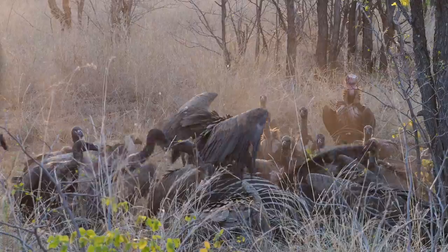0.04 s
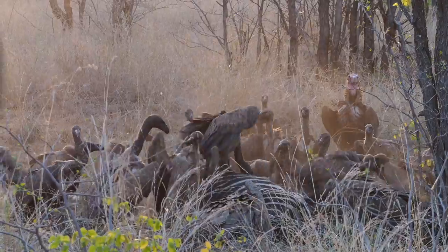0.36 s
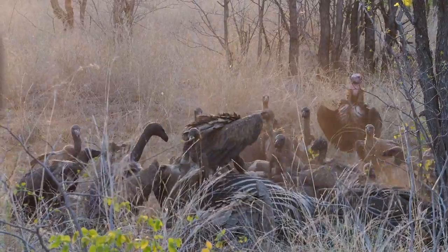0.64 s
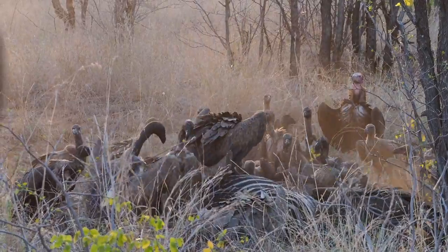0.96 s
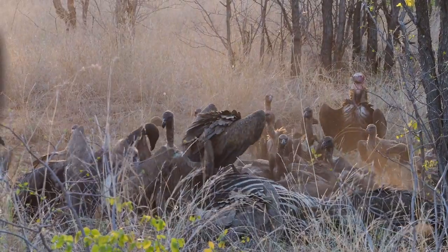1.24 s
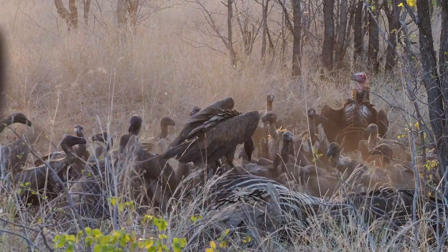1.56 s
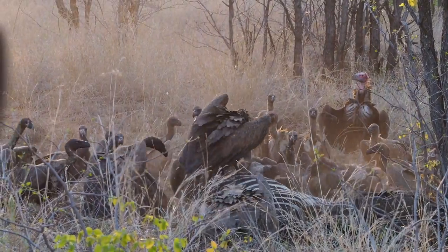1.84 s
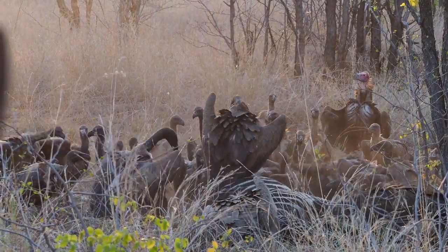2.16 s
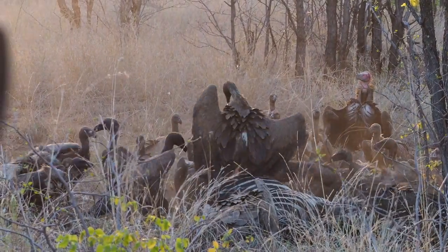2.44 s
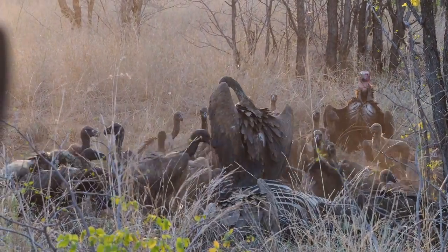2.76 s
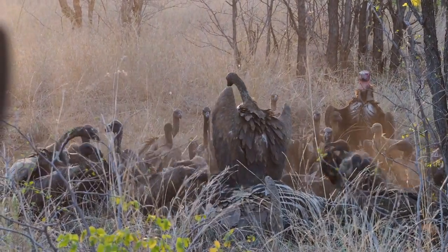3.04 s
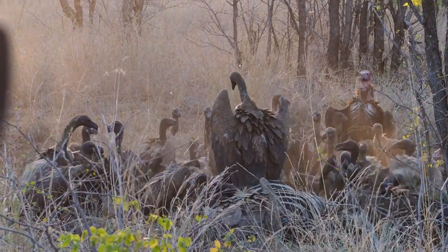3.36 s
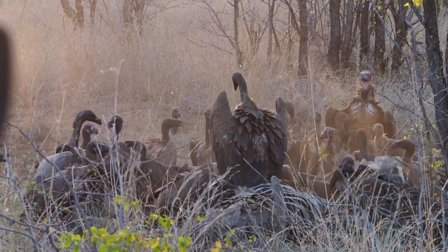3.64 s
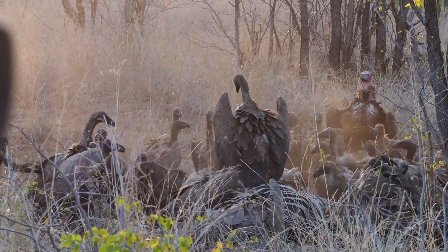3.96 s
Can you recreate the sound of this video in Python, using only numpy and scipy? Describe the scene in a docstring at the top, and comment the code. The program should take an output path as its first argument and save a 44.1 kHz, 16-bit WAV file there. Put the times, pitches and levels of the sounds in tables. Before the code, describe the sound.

Vultures squawk and hiss over the low throb of an idling engine.

```python
"""Vultures squabbling over a carcass in dry grass, in stereo from a vehicle with its engine idling.
Air forced through throat and open bill makes short rasping squawks and longer hisses; there is
one dry cackle, and feathers brush the grass. The rest of the flock hisses farther off.
Close to the microphone the engine throbs with its firing pulses and the fan hums and rushes."""
import sys
import numpy as np
from scipy import signal
from scipy.fft import rfft, irfft
from scipy.io import wavfile

SR = 44100
rng = np.random.default_rng(int(sys.argv[2]) if len(sys.argv) > 2 else 0)


def pcm_store(signal):
    """Save signal as 16-bit PCM."""
    levels = np.round(np.clip(np.atleast_2d(signal), -1, 1) * 32767)
    wavfile.write(sys.argv[1], SR, levels.astype(np.int16).T)


N = 176400
TIME = np.arange(N) / SR

# Squawks at the carcass: (start [s], length [s], level [dB], pitch [Hz], rasp [0-1], sag [octaves],
# breath level [dB], left over right [dB])
SQUAWK_CALLS = [(0.0, 0.022, -24.5, 2550, 0.34, 0.13, -30, -2.5),
                (0.021, 0.03, -22.5, 2520, 0.56, 0.16, -39, -3),
                (.044, 0.021, -36.5, 2450, 1, .02, -36, -3), (.062, 0.028, -34, 2650, .8, .1, -39, -1),
                (0.107, 0.012, -33, 2500, 1, .05, -42, -3), (.122, 0.02, -21, 2627, 0.06, 0.024, -34.5, -4),
                (.136, 0.022, -26, 2200, 0.98, 0.059, -39.5, -3),
                (.224, .022, -56, 2700, 0.7, .05, -49, -1), (.322, 0.045, -33.5, 2950, 0.8, 0.018, -51, 1),
                (.379, 0.04, -31, 2940, 1, 0.022, -47, 1), (0.435, 0.036, -31.5, 2430, 0, 0.052, -53, -2),
                (.509, 0.044, -23, 2766, 0.42, 0.05, -42.5, -2),
                (.564, 0.05, -20, 2945, 0.43, 0.1, -43, -2),
                (0.616, 0.045, -26.5, 2620, 0.4, 0.095, -39, -1.5),
                (.688, .038, -38, 2850, 0.8, .05, -45, -3), (1.813, 0.011, -28, 2660, 0.1, .04, -33, -1.5),
                (1.825, 0.023, -31, 2560, 0.9, 0.053, -37.5, -1.5),
                (1.848, 0.024, -37, 2400, 0.6, .08, -45, -4), (2.255, 0.041, -39, 2700, 1, .03, -46, -1),
                (2.341, 0.032, -33, 2520, 0.36, 0.033, -44, -3),
                (2.869, .025, -31, 2400, 0.2, 0.036, -41.5, -1),
                (2.917, 0.06, -37, 2550, 0.87, 0.034, -37, 3),
                (2.935, 0.017, -21.5, 2600, 0.18, 0.021, -47, -2),
                (2.951, 0.017, -55, 2400, 0.92, .1, -36, -2),
                (2.994, 0.02, -31.5, 2480, 0.45, .02, -40, -2),
                (3.014, 0.025, -30, 2380, 0.75, 0.11, -44, -4),
                (3.732, .036, -36, 2550, 0.9, 0.027, -43.5, -2)]
# Throaty hisses: (start [s], length [s], level [dB], throat resonance [Hz], sag [octaves],
# breath level [dB])
HISS_CALLS = [(2.802, 0.056, -46, 2620, .05, -42), (3.121, 0.11, -25.5, 2762, 0.061, -33.5),
              (3.17, 0.15, -28, 2580, .14, -42.5), (3.471, .06, -36.5, 2650, 0.018, -41.5),
              (3.522, .09, -34.5, 2615, 0.105, -38.5), (3.576, 0.14, -32.5, 2664, 0.012, -47),
              (3.817, .06, -49, 2670, .03, -51)]
# Mouth and bill resonances: (multiple of the throat pitch [ratio], level against the breath [dB])
BILL_MODES = [(1.6, -3), (1.999, -7.5)]
# Creaks of the cackle, and feathers on grass: (start [s], length [s], level [dB])
CACKLE_CREAKS = [(1.414, 0.036, -40), (1.481, 0.015, -39.5), (1.503, 0.018, -36.5), (1.554, .013, -37.5),
                 (1.592, 0.02, -35.5), (1.622, 0.024, -37.5), (1.655, .018, -36), (1.685, 0.024, -35.5),
                 (1.708, 0.015, -35.5), (1.79, 0.017, -37)]
FEATHER_STROKES = [(1.755, .08, -62), (2.245, 0.046, -50), (3.19, 0.15, -51), (3.605, 0.084, -45.5)]
# Hiss of the distant flock: (time [s], level [dB])
FLOCK_LEVELS = [(0, -48), (.4, -43), (.75, -49), (1.35, -47), (1.76, -44.5), (1.86, -39), (2.02, -38.5),
                (2.35, -37.5), (2.7, -39.5), (3.0, -37), (3.42, -40.5), (3.7, -37), (3.85, -39.5),
                (3.94, -43.5)]
# Engine orders: (multiple of the firing rate [ratio], level [dB])
FIRING_ORDERS = [(1, -14.5), (2, -26.5), (3, -60.5), (4, -36.5), (7, -48.5)]
# Hum of fan and belt: (frequency [Hz], level [dB])
FAN_HUMS = [(313.6, -39), (254, -48.5), (551.5, -55), (655, -55)]
# Colour of each noise at the microphone: (frequency [Hz], relative level [dB])
BREATH_SPECTRUM = [(500, -28), (1000, -34), (1420, 14), (1700, 4.5), (2200, 1), (3400, 2.5), (4400, 2.5),
                   (5600, 2.5), (6500, -5), (7500, -6), (8300, -18), (10500, -14.5), (11500, -36),
                   (15500, -34)]
CREAK_SPECTRUM = [(1000, -14), (1800, 1.5), (2450, 11), (2900, 1), (4600, 2.5), (6500, -6), (8500, -13),
                  (10500, -15), (12000, -28), (15500, -29)]
FEATHER_SPECTRUM = [(2000, -22), (5000, -2), (7500, 6), (10300, 1), (11500, -12), (13500, -8), (15500, -13)]
FLOCK_SPECTRUM = [(700, -17), (1400, 4.5), (1750, 0.5), (2100, 6.5), (2600, 2.5), (3500, -3.5), (4500, -3),
                  (5200, -12), (5800, -10), (6600, -19.5), (7500, -21), (8300, -28), (15000, -37)]
RUMBLE_SPECTRUM = [(12, -33), (35, -4), (55, -2.5), (80, 3.5), (105, 0.5), (138, 3), (165, -4), (200, -7),
                   (280, -13), (330, -8), (400, -16), (500, -27.5), (900, -54.5)]
FAN_SPECTRUM = [(200, -6), (480, -4.5), (660, 2.5), (800, 2), (1050, 2), (1450, 0), (1850, -18.5),
                (2200, -14), (2900, -8.5), (3800, -16.5), (4400, -36), (6000, -31), (12000, -53)]
AIR_SPECTRUM = [(1000, -16), (4000, -7), (6200, -1), (7400, 3.5), (8300, 1.5), (10400, 5), (11200, -10),
                (13500, -0.5), (15500, -19)]
# Stereo width of the noises: (frequency [Hz], side over mid [dB])
BREATH_WIDTH = [(2000, -11), (6000, -4)]
FLOCK_WIDTH = [(2000, -7), (6000, 1)]
ENGINE_WIDTH = [(40, -18), (130, -24), (300, -17), (550, -14), (1000, -11.5), (3000, -0.5), (6000, -3)]
AIR_WIDTH = [(2000, 19.5), (9000, 0.2)]

ATTACK_SHARE, HISS_ATTACK_SHARE, RELEASE_SHARE = 0.322, 0.512, 0.74   # of a sound's length
PITCH_ARCH, WOBBLE_OCTAVES = 0.249, 0.0618
HISS_PAN_DB, BREATH_PAN_DB, FLOCK_PAN_DB = -2.2, -1.8, -1.8   # all a little right of centre
FIRING_HZ, FIRST_FIRING_S, IDLE_WANDER, THROB_DEPTH = 30.67, 0.023, 0.002, 0.18
RUMBLE_DB, FAN_DB, AIR_DB = -29, -36, -54.5


def squawks():
    """Short, fast-starting calls at the carcass, from clean whistle to full rasp."""
    return throat(SQUAWK_CALLS, width_hz=450, attack=ATTACK_SHARE)


def hisses():
    """Calls from the same spot that swell more slowly and are all rasp."""
    rows = [(start, length, db, hz, 1, sag, breath_db, HISS_PAN_DB)
            for start, length, db, hz, sag, breath_db in HISS_CALLS]
    return throat(rows, width_hz=440, attack=HISS_ATTACK_SHARE)


def throat(rows, width_hz, attack):
    """A sagging throat whistle, part tone and part turbulence, with fluttering air through the bill."""
    out = np.zeros((2, N))
    wobble = WOBBLE_OCTAVES * drift(168)
    stir = turbulence(width_hz)
    beat = flutter(hz=361.4, depth=0.45)
    air = from_db(-0.5) * noise(BREATH_SPECTRUM, BREATH_WIDTH)
    bill = [(ratio, from_db(db) * turbulence(width_hz=460)) for ratio, db in BILL_MODES]
    for start, length, db, hz, rasp, sag, breath_db, pan_db in rows:
        at, progress, envelope = swell(start, length, attack)
        past_attack = progress - attack
        octaves = -sag * past_attack - PITCH_ARCH * past_attack ** 2 + rasp * wobble[at]
        phase = phase_of(hz * 2 ** octaves)
        strength = np.sqrt(2 * (1 - rasp)) + np.sqrt(rasp) * stir[at]
        whistle = np.real(strength * np.exp(1j * phase))
        voice = from_db(db) * rms_one(whistle * beat[at] ** rasp)
        ringing = sum(np.real(ring[at] * np.exp(1j * ratio * phase)) for ratio, ring in bill)
        breath = pan(BREATH_PAN_DB) * from_db(breath_db) * beat[at] * (air[:, at] + ringing)
        out[:, at] += envelope * pan(pan_db) * (voice + breath)
    return out


def turbulence(width_hz):
    """Random strength and phase of a resonance stirred by air."""
    return drift(width_hz) + 1j * drift(width_hz)


def flutter(hz, depth, jitter=0.2496):
    """Uneven beating that chops the airflow."""
    phase = phase_of(hz * (1 + jitter * drift(hz / 2)))
    return rms_one(np.exp(depth * np.cos(phase)))


def cackle():
    """A run of dry creaks, each a burst of chopped breath."""
    pulses = bursts(CACKLE_CREAKS) * flutter(hz=267.6, depth=1.05)
    return pan(FLOCK_PAN_DB) * pulses * noise(CREAK_SPECTRUM, BREATH_WIDTH)


def feathers():
    """Feathers brush the dry grass: faint, grainy strokes, wide in the image."""
    grain = from_db(3.8 * drift(200))
    return bursts(FEATHER_STROKES) * grain * noise(FEATHER_SPECTRUM, AIR_WIDTH)


def distant_flock():
    """The other birds, farther from the microphone, merge into one wavering hiss."""
    level_db = np.interp(TIME, *np.transpose(FLOCK_LEVELS)) + 0.38 * drift(57)
    return pan(FLOCK_PAN_DB) * from_db(level_db) * noise(FLOCK_SPECTRUM, FLOCK_WIDTH)


def scatter(sound, level_db=-9, t60_s=0.18):
    """Faint, quickly dying reflections reach the microphone from trunks and ground."""
    t = np.arange(SR // 2) / SR
    tail = rng.standard_normal((2, len(t))) * from_db(-60 * t / t60_s)
    tail /= np.sqrt(np.sum(tail ** 2, axis=1, keepdims=True))
    return from_db(level_db) * signal.fftconvolve(sound, tail, axes=1)[:, :N]


def engine():
    """Close by: firing pulses, a body rumble that throbs with them, and the fan's hum and rush."""
    speed = 1 + IDLE_WANDER * drift(1.7)
    firing = phase_of(FIRING_HZ * speed) - 2 * np.pi * FIRING_HZ * FIRST_FIRING_S
    pulses = -sum(from_db(db) * np.cos(order * firing) for order, db in FIRING_ORDERS)
    hum = sum(from_db(db + 1.5 * drift(6.6)) * np.sin(phase_of(hz * speed)) for hz, db in FAN_HUMS)
    throb = 1 - THROB_DEPTH * np.cos(firing)
    rumble = from_db(RUMBLE_DB) * throb * noise(RUMBLE_SPECTRUM, ENGINE_WIDTH)
    rush = from_db(FAN_DB) * noise(FAN_SPECTRUM, ENGINE_WIDTH)
    return pan(0.41) * (np.sqrt(2) * (pulses + hum) + rumble) + rush


def airy_floor():
    """A faint, wide, high hiss behind everything."""
    return from_db(AIR_DB) * noise(AIR_SPECTRUM, AIR_WIDTH)


def swell(start, length, attack):
    """Sample indices of one sound, progress through it (0-1) and its rounded envelope."""
    at = np.arange(max(int(start * SR), 0), min(int((start + length) * SR), N))
    progress = (at / SR - start) / length
    ramp = np.clip(np.minimum(progress / attack, (1 - progress) / RELEASE_SHARE), 1e-9, 1)
    return at, progress, np.sin(ramp * np.pi / 2) ** 0.73


def bursts(rows):
    """Summed envelopes of (start [s], length [s], level [dB]) rows."""
    out = np.zeros(N)
    for start, length, db in rows:
        at, _, envelope = swell(start, length, ATTACK_SHARE)
        out[at] += from_db(db) * envelope
    return out


def noise(spectrum, spread):
    """Mid-side noise of a given colour and width, as left and right at unit rms."""
    log_hz = np.log(np.fft.rfftfreq(N, 1 / SR) + 1)
    gain, width = [from_db(np.interp(log_hz, np.log(hz), db))
                   for hz, db in (np.transpose(spectrum), np.transpose(spread))]
    mid, side = rfft(rng.standard_normal((2, N))) * gain
    return rms_one(irfft(np.array([mid + width * side, mid - width * side]), N))


def drift(hz):
    """Random motion up to about the given rate, at unit rms."""
    rolloff = 1 + (np.fft.rfftfreq(N, 1 / SR) / hz) ** 4
    return rms_one(irfft(rfft(rng.standard_normal(N)) / rolloff, N))


def phase_of(hz):
    """Running phase of a changing frequency."""
    return 2 * np.pi * np.cumsum(hz) / SR


def pan(db):
    """Channel gains for a level difference, left over right."""
    return from_db(np.array([[db], [-db]]) / 2)


def from_db(db):
    """Decibels to gain."""
    return 10 ** (np.asarray(db) / 20)


def rms_one(x):
    """Scale to unit rms."""
    return x / np.sqrt(np.mean(x ** 2) + 1e-20)


def scene():
    """From the vehicle: birds out in the grass, their reflections, and the engine underneath."""
    birds = squawks() + hisses() + cackle() + distant_flock() + feathers()
    return birds + scatter(birds) + engine() + airy_floor()


def record(dry, cutoff_hz=15700):
    """The microphone signal, with the top cut steeply."""
    return signal.sosfilt(signal.ellip(10, 0.1, 80, cutoff_hz, fs=SR, output="sos"), dry)


dry = scene()
out = record(dry)
pcm_store(out)
```